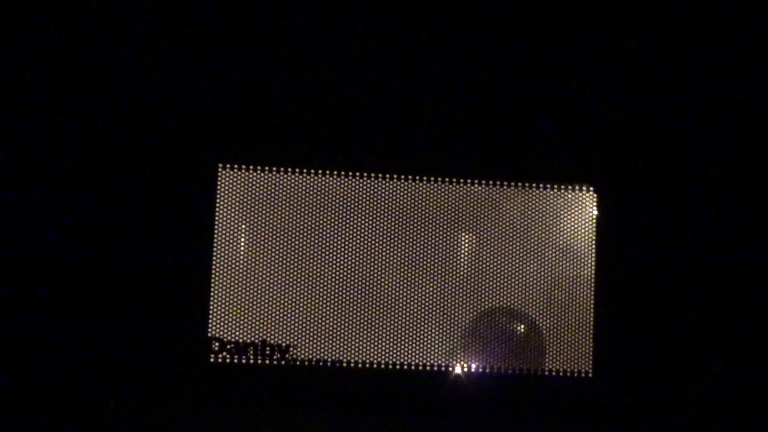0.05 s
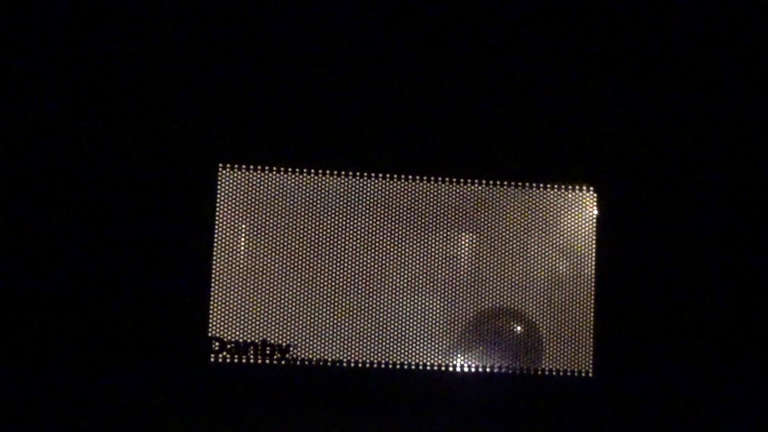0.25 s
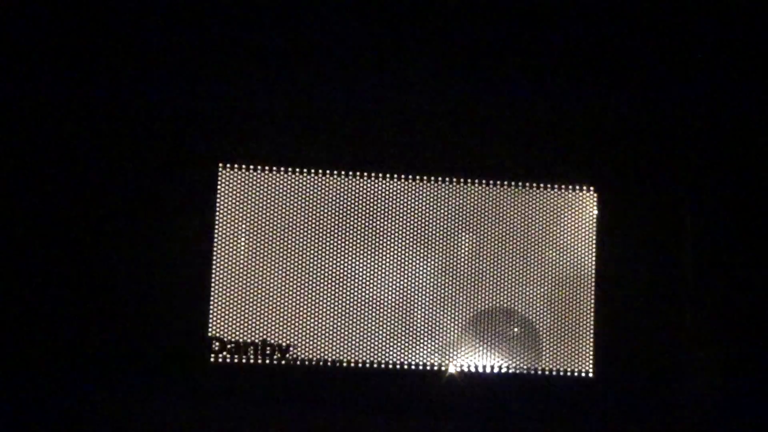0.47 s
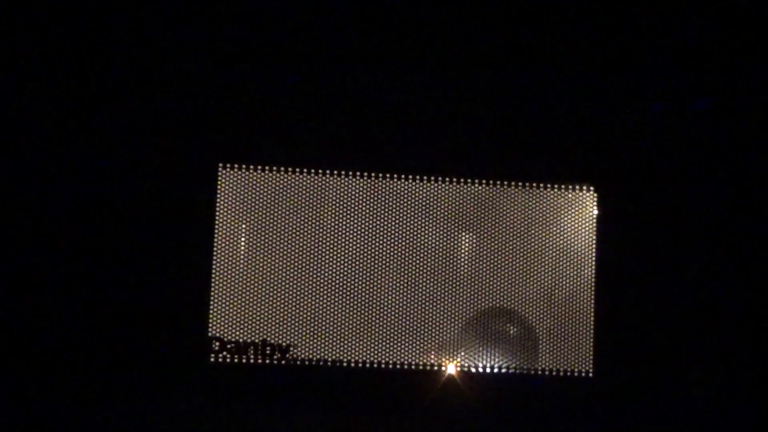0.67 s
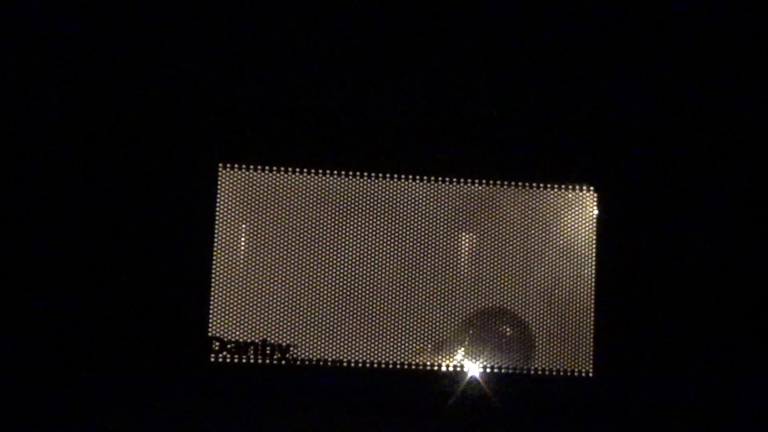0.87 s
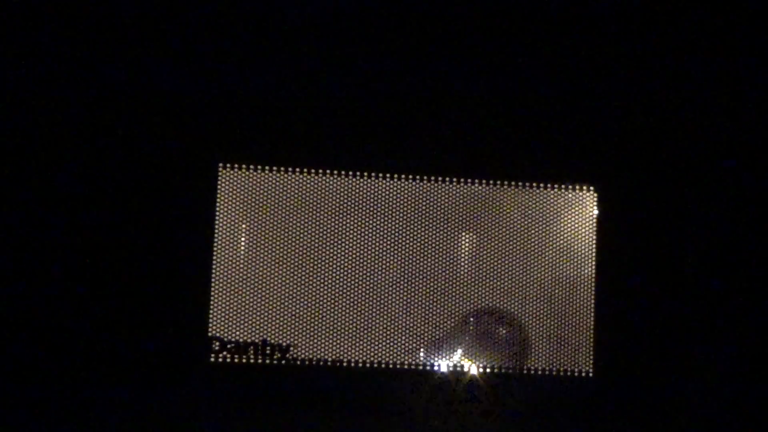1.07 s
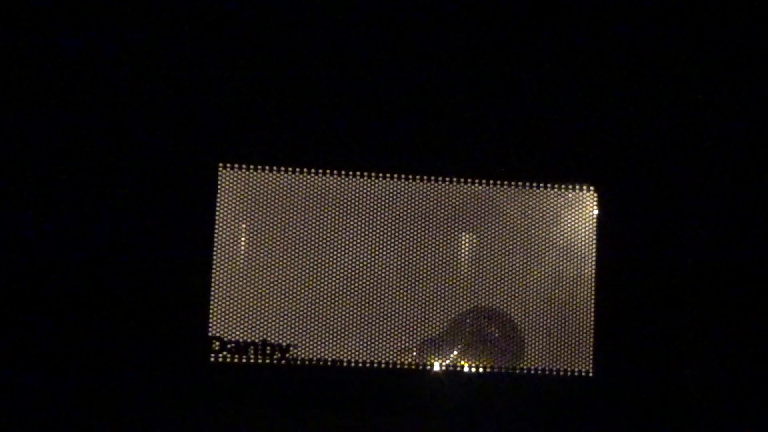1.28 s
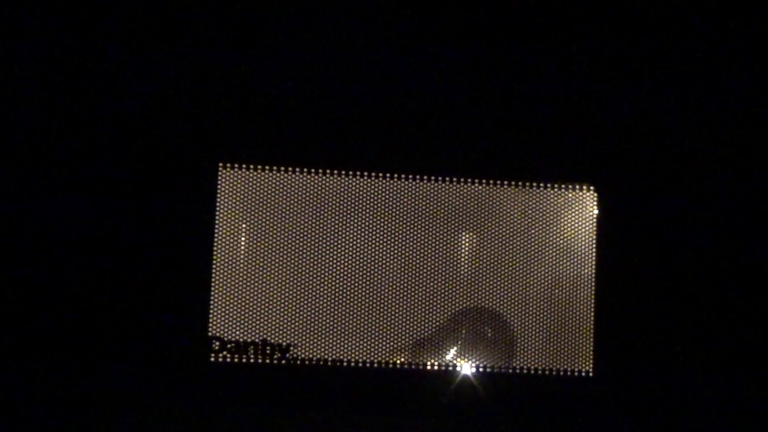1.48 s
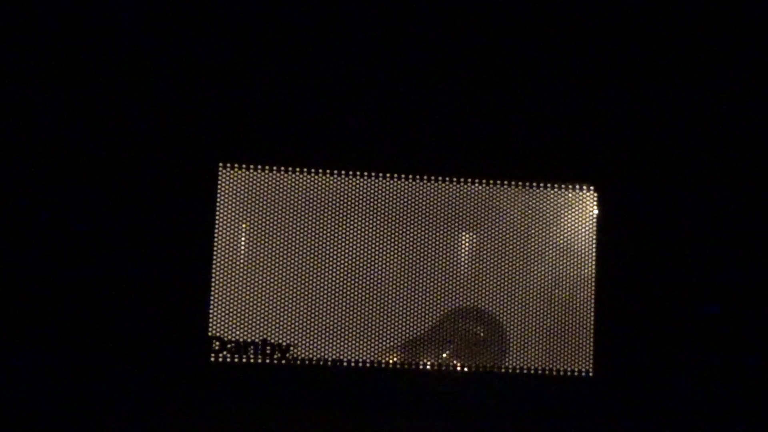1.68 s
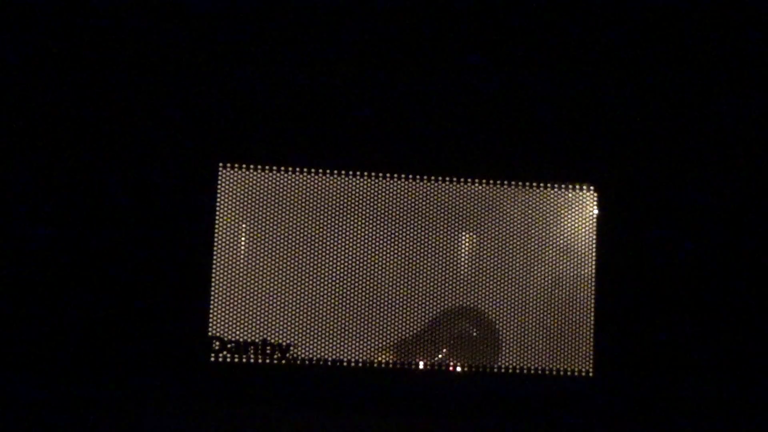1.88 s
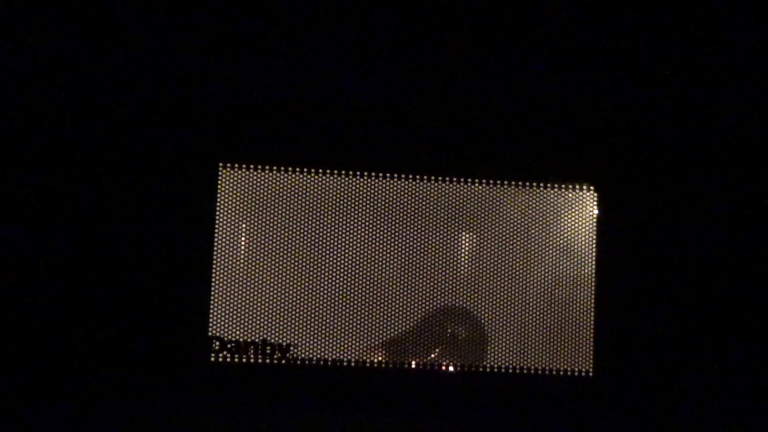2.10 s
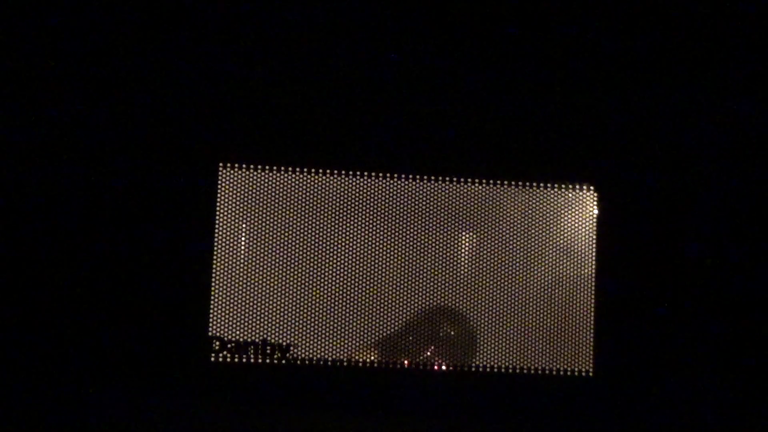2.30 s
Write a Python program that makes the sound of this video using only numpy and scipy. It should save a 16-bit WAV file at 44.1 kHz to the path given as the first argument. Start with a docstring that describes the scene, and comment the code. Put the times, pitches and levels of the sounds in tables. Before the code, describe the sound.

Electric arcing at a light bulb in a microwave oven sizzles, flares into a harsh buzz of sparks, then pops and sputters out. The glass ticks and the metal box rings over steady fan and hum, heard in stereo.

```python
"""Light bulb arcing in a microwave oven

A stereo microphone on a running oven, fan and hum behind. Inside, the arc lights once in every mains
cycle: each firing gives a low thump and a puff of hiss, sizzling through resonances that rise as the gas
heats. At its height it flares into a harsh buzz of sparks. The bulb pops and ticks; the metal box rings."""
import sys
import numpy as np
from scipy import signal
from scipy.fft import rfft, irfft, next_fast_len
from scipy.io import wavfile
from scipy.ndimage import uniform_filter1d

SR = 44100
rng = np.random.default_rng(int(sys.argv[2]) if len(sys.argv) > 2 else 0)


def waveform_to_disk(signal):
    """Save audio, clipped to [-1, 1], as 16-bit WAV at the path in sys.argv[1]."""
    frames = np.transpose(np.atleast_2d(signal))
    scaled = np.clip(frames, -1, 1) * 32767
    samples = np.round(scaled).astype(np.int16)
    wavfile.write(sys.argv[1], SR, samples)


N = 108045
T = np.arange(N) / SR
MAINS_HZ = 60

# The fan, in the background. Each row: frequency in Hz, gain in dB.
FAN_COLOUR = [(25, -6), (60, 3.5), (110, 0), (150, -5.5), (300, -13.5), (520, -8.5), (750, -15),
              (1900, -15.5), (2600, -23.5), (3900, -24), (6500, -26.5), (8500, -22.5), (12000, -36.5),
              (15500, -42)]
# Hum of motor and transformer. Each row: frequency in Hz, level in dB.
HUM_TONES = [(60, -70), (120, -96), (137, -51.5), (241, -58.5), (274.5, -54.5), (360, -73), (411, -60),
             (540, -65)]
# Brief low drones. Each row: start and length in seconds, frequency in Hz, level in dB.
DRONE_SWELLS = [(.64, 0.2, 200, -42), (1.69, 0.22, 160.5, -44.5)]
# Ticks of the hot glass. Each row: time in seconds, level in dB.
GLASS_TICKS = [(.005, -28), (.019, -29), (.034, -30.5), (.047, -31), (.724, -24.5), (0.829, -30.5),
               (1.217, -35), (1.308, -35), (1.943, -41), (2.206, -30.5)]
# What a tick rings with. Each row: frequency in Hz, seconds to fall 60 dB, level in dB.
GLASS_MODES = [(554, 0.021, -3), (684, 0.049, -10.5), (1404, 0.014, -8), (3400, 0.0086, -8.5),
               (4160, 0.045, -10.5), (4440, 0.017, -5)]
# One bright spit. Each row: frequency in Hz, gain in dB.
SPIT_SPECTRUM = [(2000, -17), (4500, -13), (5000, 2), (5500, -17), (9000, -5.5), (12000, -15), (15500, -29)]
# Pops of the arc. Each row: time in seconds, thump level in dB, crack level in dB.
ARC_POPS = [(0.28, -33, -43.5), (0.563, -26.5, -58), (0.6138, -26.5, -31), (0.8118, -23, -35),
            (0.9961, -26.5, -24), (1.613, -29.5, -31)]
# Resonances of a crack. Each row: centre and width in Hz, gain in dB.
CRACK_RESONANCES = [(1265, 84, 9), (1617, 50, 4), (2554, 110, 5)]
# Noise under them. Each row: frequency in Hz, gain in dB.
CRACK_SPECTRUM = [(200, 2.5), (700, 0), (1000, -21), (2000, -5), (3400, -1), (4500, -10), (9000, -6),
                  (15000, -29)]
# Low modes of the box. Each row: frequency in Hz, seconds to fall 60 dB, level in dB.
BOX_MODES = [(112.3, 0.21, -11.5), (159.4, 0.52, -12.5), (198, 0.21, -11), (335, 0.035, -13.5)]
# Strength of the thumping. Each row: time in seconds, relative level in dB.
THUMP_LEVELS = [(0, -43), (.17, -41), (.21, -39.5), (.29, -31), (.37, -39), (.45, -27.5), (.52, -37.5),
                (.6, -33.5), (.68, -38), (.745, -48), (0.789, -30.5), (0.861, -44.5), (.95, -31),
                (1.09, -32.5), (1.17, -42), (1.278, -33), (1.38, -45.5), (1.6, -39.5), (1.68, -39),
                (1.81, -41.5), (1.85, -42)]
# Spells of sizzling. Each row: start and end in seconds, first and last level in dB.
SIZZLE_SPELLS = [(0, .045, -37, -41.5), (.077, .095, -44, -34), (.143, .16, -54.5, -22.5),
                 (.194, .36, -34.5, -31), (.56, .69, -30.5, -29), (.69, .761, -38, -43),
                 (.763, .84, -28, -32), (.878, 1.0, -31.5, -32), (1.0, 1.205, -33.5, -35.5),
                 (1.205, 1.41, -43, -40), (1.41, 1.755, -45, -46), (1.763, 1.785, -32.5, -43.5),
                 (1.796, 1.836, -35, -44)]
# Resonances of the sizzle, before heat shifts them. Each row: centre and width in Hz, gain in dB.
GAS_RESONANCES = [(4680, 200, -7), (5270, 380, 1.5), (6080, 130, -5.5), (8200, 580, 1), (9570, 260, -6),
                  (10600, 480, -10), (13600, 900, -18)]
# Hiss under them. Each row: frequency in Hz, gain in dB.
HISS_COLOUR = [(200, -5), (600, -13), (1300, -15.5), (2500, -18), (4000, -16), (7500, -16), (10500, -13),
               (12300, -24.5), (16000, -25)]
# Heat raises the resonances. Each row: time in seconds, frequency ratio.
HEAT_SHIFT = [(0, 1.01), (.3, 1.005), (.8, 1), (.95, 1.01), (1.07, 1.08), (1.18, 1.1), (1.33, 1.135),
              (1.52, 1.105), (1.7, 1.085), (1.82, 1.05)]
# The sizzle's thin whistle. Each row: time in seconds, gain in dB.
WHISTLE_LEVELS = [(0, -5), (.28, 3), (.8, -5.5), (.95, 4.5), (1.15, -15), (1.35, -13)]
# Runs of hard sparks. Each row: start and end in seconds, first and last level in dB.
FLARE_RUNS = [(0.3607, .37, -17.5, -15.5), (0.3918, .47, -17, -19.5), (0.4744, .55, -17.5, -18),
              (0.557, .57, -22.5, -23), (0.6467, .65, -23, -21.5)]
# Tone of a spark. Each row: frequency in Hz, gain in dB.
SPARK_COLOUR = [(150, -5), (400, -23.5), (660, -11.5), (950, -17.5), (1500, -9.5), (2200, -9.5),
                (3000, -5.5), (3600, -7), (5000, -2), (6500, -5), (7200, 1.5), (9000, 0.5), (11200, -5),
                (12500, -12.5), (15500, -21.5)]
# Wall modes that the sparks bring out. Each row: centre and width in Hz, gain in dB.
WALL_MODES = [(680, 55, 8), (1830, 20, 14), (4065, 100, 6), (4660, 60, 6)]
# Stereo width of the arc and of the running oven. Each row: frequency in Hz, side minus mid in dB.
ARC_WIDTH = [(60, -26), (120, -49), (240, -20), (480, -14), (950, -8.5), (1890, -13), (3770, -26),
             (7520, -15), (15000, -56)]
OVEN_WIDTH = [(60, -29), (150, -30), (380, -18.5), (950, -6), (2380, -7.5), (5980, -6), (15000, -19)]
# The microphone's low end. Each row: frequency in Hz, gain in dB.
MIC_RESPONSE = [(25, -16), (45, -20), (62, -10), (90, -14), (120, -4), (160, 0.5), (250, -0.5)]


def amp(db):
    """Decibels to gain."""
    return 10 ** (np.asarray(db) / 20)


def unit(x):
    """Scales to rms 1."""
    return x / np.sqrt(np.mean(x ** 2) + 1e-20)


def shape(points, hz):
    """Gain of a (Hz, dB) table at any frequency."""
    points_hz, db = np.transpose(points)
    return amp(np.interp(np.log(hz + 1), np.log(points_hz), db))


def peaks(table, hz):
    """Gain of a set of resonances, added in power."""
    powers = (amp(db) ** 2 / (1 + (2 * (hz - centre) / width) ** 2) ** 2 for centre, width, db in table)
    return np.sqrt(sum(powers))


def colour(x, gain):
    """Filters x by a gain that is a function of frequency."""
    size = next_fast_len(len(x) + 2048)
    return irfft(rfft(x, size) * gain(np.fft.rfftfreq(size, 1 / SR)), size)[:len(x)]


def noise(gain, samples=N):
    """White noise filtered by such a gain."""
    return colour(rng.standard_normal(samples), gain)


def add(mix, start_s, sound):
    """Mixes a sound in at its start time."""
    part = mix[max(round(start_s * SR), 0):][:len(sound)]
    part += sound[:len(part)]


def wander(rate_hz):
    """Smooth random drift of rms 1."""
    return unit(noise(lambda hz: 1 / (1 + (hz / rate_hz) ** 4)))


def echoes(x, t60_s):
    """Dense reflections of x that fall 60 dB in t60_s."""
    t = T[:SR // 3]
    tail = rng.standard_normal(len(t)) * amp(-60 * t / t60_s) * (t > .001)
    return signal.fftconvolve(x, tail / np.linalg.norm(tail))[:N]


def room(x, width):
    """Room echoes reach the left and right of the microphone a little differently."""
    side = colour(echoes(x, t60_s=.17), lambda hz: shape(width, hz))
    return np.array([x + side, x - side])


def running_oven():
    """The background: fan noise, hum of motor and transformer, and a narrow, throbbing whine."""
    fan_db, whine_db, whine_hz, whine_width_hz, throb_depth = -43, -47.5, 3078, 340, .063
    fan = unit(noise(lambda hz: shape(FAN_COLOUR, hz)))
    hum = np.zeros(N)
    for tone_hz, db in HUM_TONES:
        phase = 2 * np.pi * (tone_hz * T + rng.random()) + .28 * wander(rate_hz=20)
        hum += amp(db) * np.sqrt(2) * np.sin(phase)
    whine = noise(lambda hz: peaks([(whine_hz, whine_width_hz, 0)], hz))
    throb = 1 + throb_depth * np.sin(2 * np.pi * MAINS_HZ * T)
    return amp(fan_db) * fan + hum + amp(whine_db) * unit(whine * throb)


def drones():
    """Two low tones swell and fade."""
    out = np.zeros(N)
    for start, length, hz, db in DRONE_SWELLS:
        swell = np.hanning(round(length * SR))
        add(out, start, amp(db) * swell * np.sin(2 * np.pi * hz * T[:len(swell)]))
    return out


def ring(modes, t):
    """Dying modes after a blow."""
    return sum(amp(db - 60 * t / t60) * np.sin(2 * np.pi * hz * t) for hz, t60, db in modes)


def burst(gain, decay_s, rise_s=.0003):
    """Coloured noise that dies quickly."""
    t = T[:SR // 6]
    return unit(noise(gain, len(t))) * np.minimum(t / rise_s, 1) * np.exp(-t / decay_s)


def glass_ticks(snap_db=-7, snap_cutoff_hz=3600):
    """The hot glass ticks: a snap and a short ring."""
    out = np.zeros(N)
    for start, db in GLASS_TICKS:
        snap = amp(snap_db) * burst(lambda hz: 1 / (1 + (hz / snap_cutoff_hz) ** 2), decay_s=.007)
        add(out, start, amp(db) * (ring(GLASS_MODES, T[:len(snap)]) + snap))
    return out


def arc_cracks(spit_at_s=1.5655, spit_db=-29):
    """A short crack for each pop of the arc, and one bright spit."""
    out = np.zeros(N)
    for start, _, crack_db in ARC_POPS:
        crack = burst(lambda hz: np.hypot(shape(CRACK_SPECTRUM, hz), peaks(CRACK_RESONANCES, hz)),
                      decay_s=.015, rise_s=.0016)
        add(out, start, amp(crack_db) * crack)
    add(out, spit_at_s, amp(spit_db) * burst(lambda hz: shape(SPIT_SPECTRUM, hz), decay_s=.006))
    return out


def arc_thumps(first_s=.0153, pulse_s=.0016, jitter_s=.00028, spread_db=.8, trim_db=-1):
    """Each firing and each pop pushes the air in the box and rings its low modes."""
    lead_s = 3 * pulse_s  # the pulse begins ahead of its centre
    t = T[:SR // 5] - lead_s
    pulse = t / pulse_s * np.exp((1 - (t / pulse_s) ** 2) / 2)
    push = pulse + ring(BOX_MODES, np.maximum(t, 0))
    firings, pops = np.zeros(N), np.zeros(N)
    times, levels_db = np.transpose(THUMP_LEVELS)
    for cycle in range(int(times[-1] * MAINS_HZ)):
        late_s, stray_db = rng.normal(0, [jitter_s, spread_db])
        add(firings, first_s + cycle / MAINS_HZ + late_s - lead_s, push * amp(stray_db))
    for start, thump_db, _ in ARC_POPS:
        add(pops, start + pulse_s - lead_s, push * amp(thump_db))
    return pops + unit(firings) * amp(trim_db + np.interp(T, times, levels_db))


def arc_envelope(ignition_s=.009, burn_s=.011, edge_s=.0015, floor=.14, spread_db=.8, grain_db=1.5):
    """One grainy burn in each mains cycle while a spell lasts, with a little hiss left between burns."""
    cycle, fraction = np.divmod((T - ignition_s) * MAINS_HZ + 1, 1)
    age = fraction / MAINS_HZ
    burn = floor + np.clip(np.minimum(age, burn_s - age) / edge_s, 0, 1)
    flicker_db = spread_db * rng.standard_normal(N)[cycle.astype(int)] + grain_db * wander(rate_hz=510)
    level = sum((T >= start) * (T < end) * amp(np.interp(T, [start, end], [first_db, last_db]))
                for start, end, first_db, last_db in SIZZLE_SPELLS)
    return unit(burn * amp(flicker_db)) * uniform_filter1d(level, size=44)


def arc_sizzle(whistle_hz=11230, whistle_width_hz=300):
    """Puffs of hiss through resonances that follow the heat of the gas; one is a thin whistle."""
    hz, t, spectrum = signal.stft(rng.standard_normal(N), SR, nperseg=1024, noverlap=768)
    cold_hz = hz[:, None] / np.interp(t, *np.transpose(HEAT_SHIFT))
    whistle = peaks([(whistle_hz, whistle_width_hz, 0)], cold_hz)
    whistle *= amp(np.interp(t, *np.transpose(WHISTLE_LEVELS)))
    power = peaks(GAS_RESONANCES, cold_hz) ** 2 + whistle ** 2 + shape(HISS_COLOUR, hz)[:, None] ** 2
    _, hiss = signal.istft(spectrum * np.sqrt(power), nperseg=1024, noverlap=768)
    return unit(hiss[:N]) * arc_envelope()


def arc_flares(rise_s=.004, early_s=.012, early_db=-6, t60_s=.24, jitter_s=.00045, spread_db=.8):
    """One hard spark in each mains cycle; all wake the same echoes of the box, so they buzz."""
    t, out = T[:SR // 3], np.zeros(N)
    reflections = noise(lambda hz: shape(SPARK_COLOUR, hz) * np.hypot(1, peaks(WALL_MODES, hz)), len(t))
    early = amp(early_db) / (1 + (t / early_s) ** 8)
    tail = amp(-60 * t / t60_s)
    spark = reflections * np.minimum(t / rise_s, 1) * (early + tail)
    spark *= np.sqrt(SR / MAINS_HZ) / np.linalg.norm(spark)  # a run of sparks has an rms near 1
    for start, end, first_db, last_db in FLARE_RUNS:
        for due_s in np.arange(start, end, 1 / MAINS_HZ):
            late_s, stray_db = rng.normal(0, [jitter_s, spread_db])
            level_db = np.interp(due_s, [start, end], [first_db, last_db])
            add(out, due_s + late_s, spark * amp(level_db + stray_db))
    return out


def scene():
    """Heard from the room: arc and glass ring in the metal box, over the running oven."""
    sizzle = arc_sizzle()
    hits = arc_cracks() + glass_ticks()
    boxed_sizzle = amp(-5.5) * sizzle + amp(-2) * echoes(sizzle, t60_s=.14)
    boxed_hits = hits + amp(-3) * echoes(hits, t60_s=.12)
    inside = boxed_sizzle + boxed_hits + arc_flares() + arc_thumps() + drones()
    return room(inside, ARC_WIDTH) + room(running_oven(), OVEN_WIDTH)


def record(dry):
    """The microphone loses the deepest bass, and the top treble is cut off."""
    thinned = np.array([colour(channel, lambda hz: shape(MIC_RESPONSE, hz)) for channel in dry])
    lowpass = signal.firwin(511, cutoff=15750, window=("kaiser", 9), fs=SR)
    return signal.oaconvolve(thinned, lowpass[None], "same")


dry = scene()
out = record(dry)
waveform_to_disk(out)
```